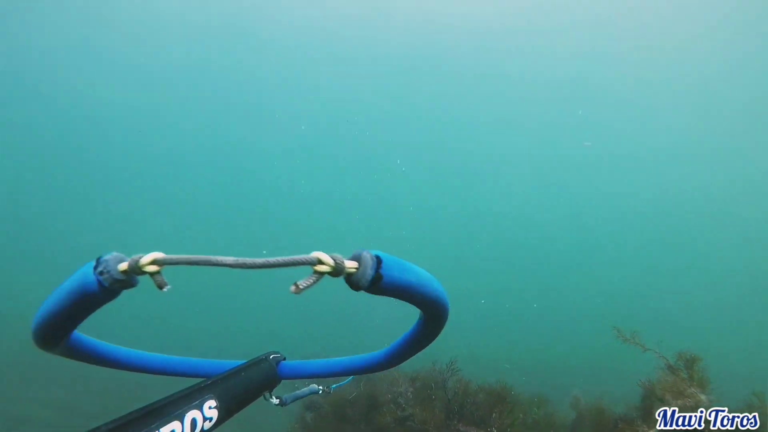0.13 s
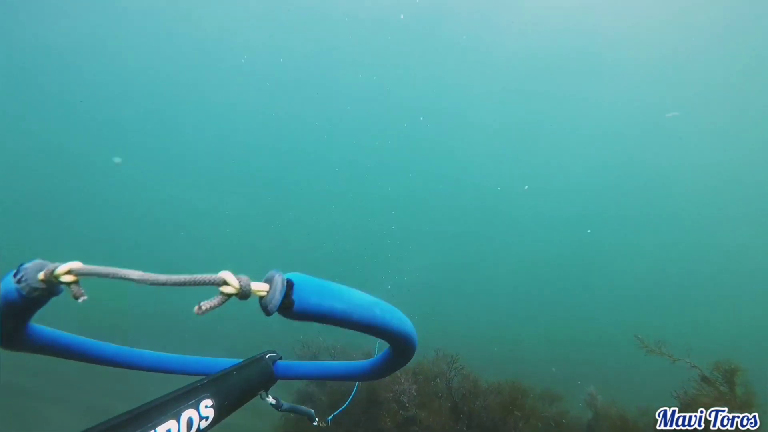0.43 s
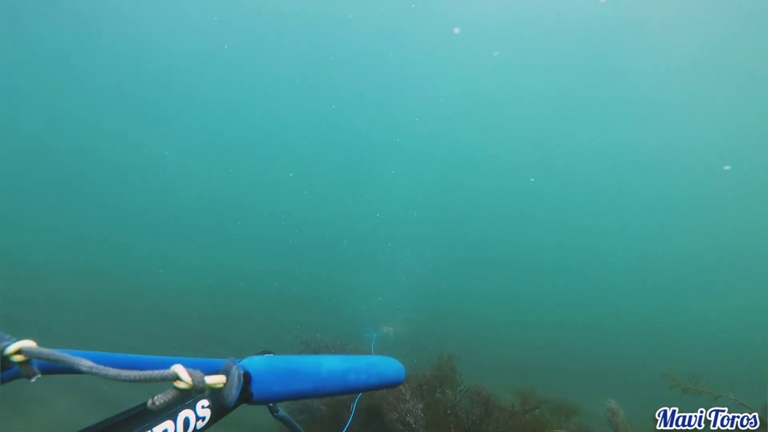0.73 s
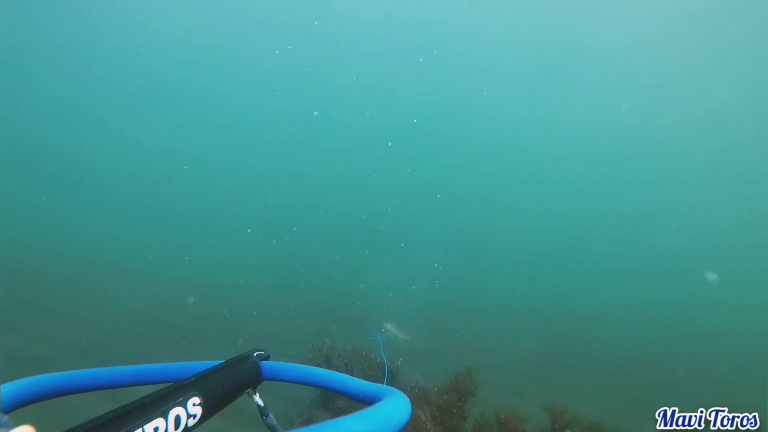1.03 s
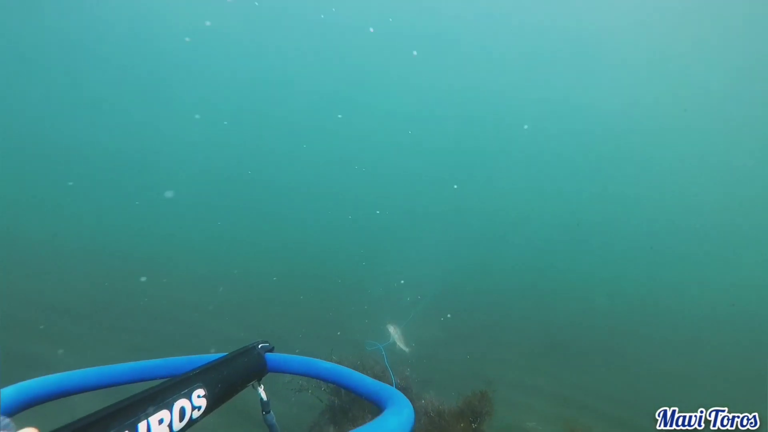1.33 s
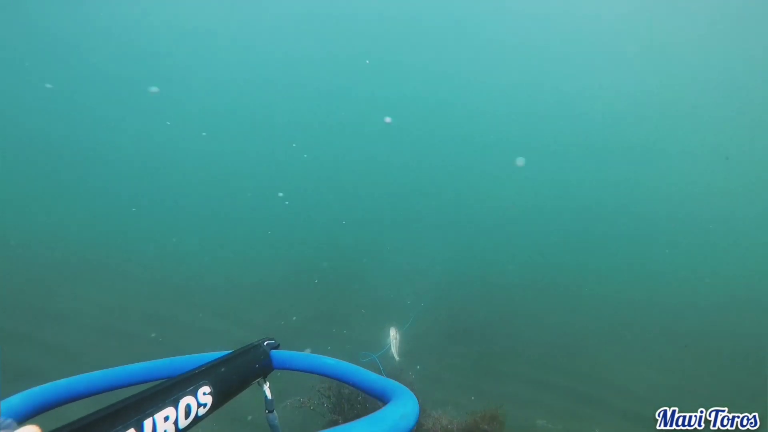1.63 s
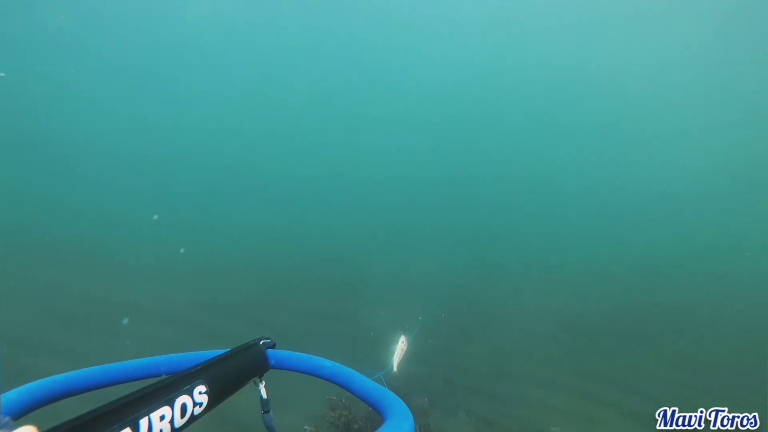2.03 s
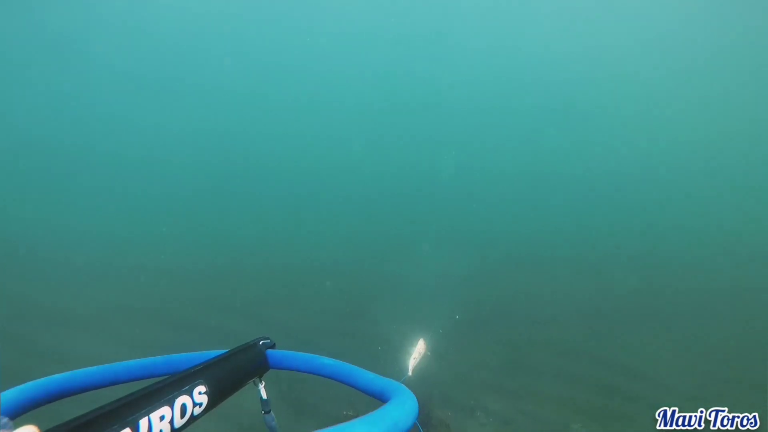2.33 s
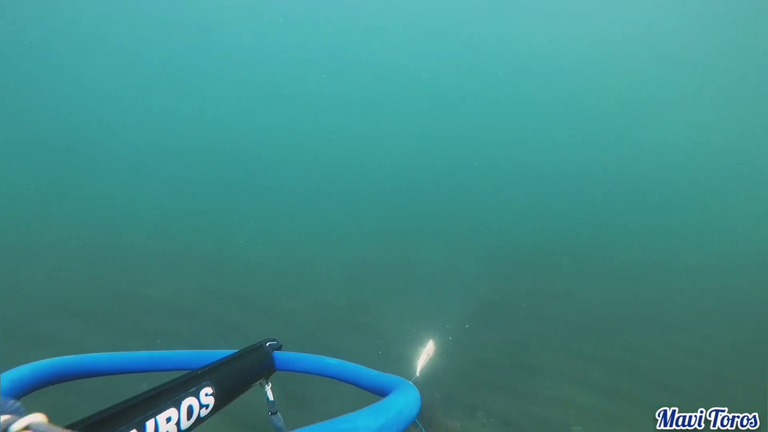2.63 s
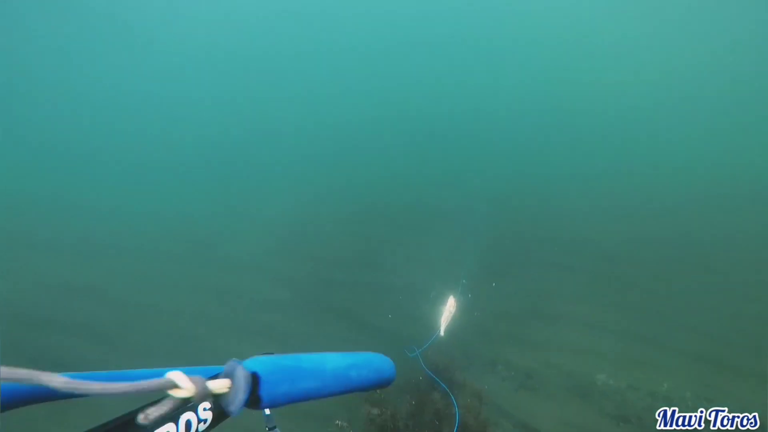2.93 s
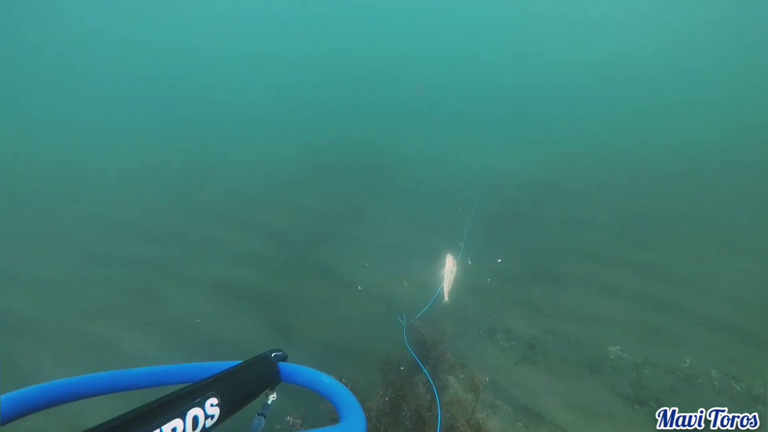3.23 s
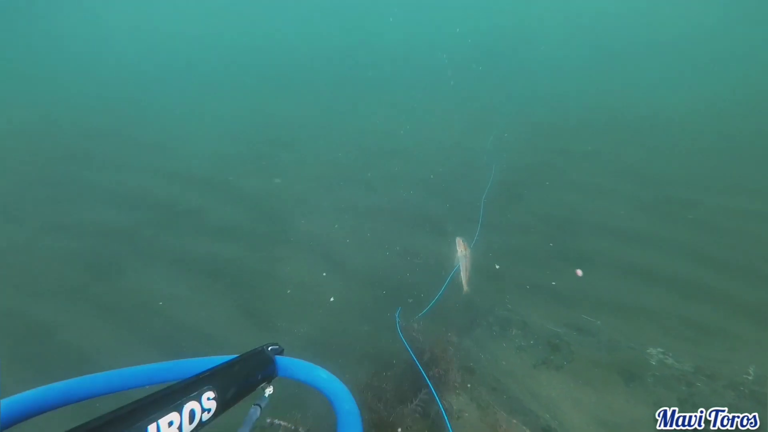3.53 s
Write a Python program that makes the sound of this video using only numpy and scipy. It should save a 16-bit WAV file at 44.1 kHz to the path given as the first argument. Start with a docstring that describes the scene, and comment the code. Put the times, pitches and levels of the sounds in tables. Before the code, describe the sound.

Water rumbles and sloshes against a sealed underwater camera housing, surging heavily near the end with one hollow knock

```python
"""Water rumbles, sloshes and rushes right against a sealed camera housing on a speargun, under water.
Faint rasps, scrapes, eddy thumps, bubbles and gear ticks sit on the case, close to its two microphone ports;
a hard kick near the end brings a surge and one hollow knock. Water is lumpy filtered noise, thumps and bubbles
are swelling cosines, scrapes are noise bursts, ticks are bursts through resonances, the knock is decaying sines.
The recorder starts in mono and opens to its two ports after two seconds."""
import sys
import numpy as np
from scipy import signal
from scipy.fft import rfft, irfft, next_fast_len
from scipy.io import wavfile
from scipy.ndimage import uniform_filter1d, minimum_filter1d

SR = 44100
rng = np.random.default_rng(int(sys.argv[2]) if len(sys.argv) > 2 else 0)


def unload_wav(signal):
    """Save mono or channel-first audio to the path in sys.argv[1] as 16-bit WAV at rate SR, clipped to [-1, 1]."""
    wavfile.write(
        sys.argv[1],
        SR,
        np.round(np.clip(np.atleast_2d(signal).T, -1, 1) * 32767).astype(np.int16),
    )


N = 163170
LONG = N + SR // 2  # samples, with half a second to spare for late tails


def gain_of(db):
    """Decibels to gain."""
    return 10 ** (np.asarray(db) / 20)


def evened(x):
    """Scales to rms 1."""
    return x / np.sqrt(np.mean(x ** 2) + 1e-20)


def peaked(x, db):
    """Scales to a peak level."""
    return gain_of(db) * x / np.abs(x).max()


def smoothed_twice(x, size):
    """Two moving averages in a row."""
    return uniform_filter1d(uniform_filter1d(x, size=size), size=size)


def read(points, hz):
    """Reads a spectrum table on a log frequency axis."""
    f, value = np.transpose(points)
    return np.interp(np.log(hz + 1), np.log(f + 1), value, left=value[0], right=value[-1])


def shut(points):
    """Closes a spectrum table steeply, an octave beyond both ends."""
    return [(points[0][0] / 2, -90)] + points + [(points[-1][0] * 2, -90)]


def coloured(x, gain):
    """Filters by a gain given as a function of frequency."""
    size = next_fast_len(x.shape[-1] + SR // 10)
    spectrum = rfft(x, size) * gain(np.fft.rfftfreq(size, 1 / SR))
    return irfft(spectrum, size)[..., :x.shape[-1]]


def add(mix, s, sound):
    """Mixes a sound in at time s."""
    part = mix[round(s * SR):][:len(sound)]
    part += sound[:len(part)]


# How the water swells and sinks around the case. Each row: time in seconds, then the levels
# of rumble, slosh, rush and hiss in dB.
WATER_LEVELS = [(0, -64, -63, -63, -81), (.3, -47, -49.5, -52.5, -78.5), (.55, -46.5, -45.5, -46, -72.5),
                (1.05, -41, -43.5, -48, -67.5), (1.098, -21, -30.5, -44.5, -68),
                (1.27, -35.5, -44.5, -46.5, -67), (1.68, -34.5, -36, -43, -62),
                (1.727, -35, -31, -36.5, -59.5), (2.2, -33.5, -41, -41.5, -58),
                (2.36, -33, -31.5, -46.5, -64.5), (2.763, -31.5, -43, -44.5, -61.5),
                (2.89, -16, -18, -35, -60.5), (3.161, -22.5, -12.5, -34.5, -66.5),
                (3.197, -20.5, -27, -53, -79.5), (3.328, -19.5, -22, -44, -70), (3.7, -18, -24, -44.5, -63)]


def water_level(column):
    """Gain of one water layer, sample by sample, in straight dB lines between the rows."""
    rows = np.array(WATER_LEVELS)
    return gain_of(np.interp(np.arange(LONG) / SR, rows[:, 0], rows[:, column]))


# Colour of each water layer at the case, deep to bright. Each row: frequency in Hz,
# relative density in dB per Hz.
RUMBLE_SPECTRUM = [(25, 2), (100, -1.5), (150, -11), (220, -51)]
SLOSH_SPECTRUM = [(60, -13), (130, -1.5), (262, -2), (400, -13), (700, -32), (2000, -50), (4000, -57)]
RUSH_SPECTRUM = [(480, 5), (640, -1), (1050, 0), (1200, -2), (1400, -15), (1900, -15.5), (2400, -16.5),
                 (2900, -21.5), (3500, -33)]
HISS_SPECTRUM = [(3500, 7.5), (7500, 5.5), (9600, 7.5), (13500, -7.5), (15200, -18.5)]
# Lumpiness of the water, one row each for rumble, slosh, rush and hiss. Each row: spread of the layer's
# own patches in dB, spread of the flicker shared by all layers in dB.
WATER_LUMPS = [(3, 2), (3, 1.5), (2.8, 1.8), (1, .8)]


def water():
    """Four layers of lumpy noise on their own levels; row 0 is shared by the ports, row 1 is not."""
    frames, bins = LONG // 128 + 9, 257
    flicker = evened(smoothed_twice(rng.standard_normal(frames), 9))
    out = np.zeros((2, LONG))
    for k, spectrum in enumerate([RUMBLE_SPECTRUM, SLOSH_SPECTRUM, RUSH_SPECTRUM, HISS_SPECTRUM]):
        patch_db, flicker_db = WATER_LUMPS[k]
        draw = rng.standard_normal((5, bins, frames))
        # patches span more bins in the brighter layers
        patches = uniform_filter1d(draw[4], size=3 + 2 * k, axis=0)
        patches = evened(uniform_filter1d(patches, size=8, axis=1))
        lumps = gain_of(patch_db * patches + flicker_db * flicker)
        cells = (draw[:2] + 1j * draw[2:4]) * lumps
        noise = signal.istft(cells, nperseg=512, noverlap=384)[1][:, :LONG]
        noise = coloured(noise, lambda f: gain_of(read(shut(spectrum), f)))
        out += water_level(k + 1) * evened(noise)
    return out


RISE_SHARE = .23  # rise time as a share of the decay time
RASP_Q = 1.57


def burst(decay_s):
    """A rattle of noise with a soft start and an exponential decay."""
    t = np.arange(SR // 10) / SR
    rise = np.minimum(t / (RISE_SHARE * decay_s), 1)
    return rng.standard_normal(len(t)) * rise * np.exp(-t / decay_s)


def rasp(decay_s, db, hz):
    """A short rasp of noise around a broad centre."""
    return peaked(coloured(burst(decay_s), lambda f: 1 / (1 + (RASP_Q * (f / hz - hz / (f + 1))) ** 2)), db)


TICK_DECAY_S = .003  # of the bursts in faint rasps, ticks and the knock's crack
FAINT_PER_S = 70  # mean rate
FAINT_DB, FAINT_SPREAD_DB = 13.5, 3  # base gain over the hiss level, scale of the random extra
FAINT_HZ = (1500, 5000)  # lowest and highest pitch
FAINT_STEP_DB = -1  # from each of the twelve pitches to the next


def faint_ticks():
    """Small chance rasps on the case, dull to bright, following the hiss level."""
    extra_db = FAINT_SPREAD_DB * np.minimum(rng.exponential(1, LONG), 3)
    hits = gain_of(extra_db) * (rng.random(LONG) < FAINT_PER_S / SR)
    pitches = np.geomspace(*FAINT_HZ, num=12)
    which = rng.integers(0, len(pitches), LONG)
    total = np.zeros(LONG)
    for k, hz in enumerate(pitches):
        sound = rasp(TICK_DECAY_S, FAINT_STEP_DB * k, hz)
        total += signal.oaconvolve(hits * (which == k), sound)[:LONG]
    return gain_of(FAINT_DB) * water_level(column=4) * total


SCRAPE_DECAY_S = .0092
# Bright scrapes and splashes close on the case. Each row: start in seconds, peak in dB, centre in Hz.
SCRAPE_EVENTS = [(0.11, -56.5, 4170), (0.742, -37, 3700), (1.13, -42, 8800), (1.277, -53, 4000),
                 (1.706, -41, 8000), (1.812, -33, 2870), (1.859, -23.5, 3540), (2.679, -46.5, 4130),
                 (2.9, -40, 3830), (2.972, -34.5, 2520), (3.623, -34.5, 2870)]


def scrapes(gear):
    """Adds the scrapes and splashes, each a burst of broadly centred noise."""
    for s, db, hz in SCRAPE_EVENTS:
        add(gear, s, rasp(SCRAPE_DECAY_S, db, hz))


def thump(centre, db, hz, cycles):
    """A cosine in a bell-shaped swell: a soft push of a cycle or two, or a bubble that rings for several."""
    t = np.arange(-2 * cycles / hz, 2 * cycles / hz, 1 / SR)
    swell = np.exp(-(2 * t * hz / cycles) ** 2)
    return centre + t[0], gain_of(db) * swell * np.cos(2 * np.pi * hz * t)


# Eddies that thump the case and trapped bubbles that blip. Each row: centre in seconds, peak in dB,
# pitch in Hz, length in cycles.
THUMP_EVENTS = [(.465, -38.5, 770, 25), (0.828, -32, 500, 7.1), (0.847, -21.5, 103, 1.6),
                (1.089, -25, 281, 5.7), (1.192, -20.5, 60, 0.77), (1.331, -19, 82, 0.98),
                (1.849, -24.5, 267, 7.4), (2.634, -15, 89, 1.25), (2.991, -14, 1800, 4.6),
                (3.418, -11, 86, 1.75)]


def thumps(gear):
    """Adds the eddy thumps and bubble blips."""
    for row in THUMP_EVENTS:
        add(gear, *thump(*row))


def resonate(x, hz, width):
    """A steep resonance: one pole pair, passed twice."""
    pole = np.exp((2j * hz - width) * np.pi / SR)
    return 2 * (1 - abs(pole)) ** 2 * signal.lfilter([1], np.poly([pole, pole]), x).real


# Resonances of the housing. Each row: frequency in Hz, width of one pole in Hz, relative gain in dB.
CASE_MODES = [(1018, 460, 17), (2170, 27, 8.5), (2400, 310, 5.5), (2810, 550, -1)]


def case(x):
    """The case rings briefly; neighbouring modes have opposite signs."""
    return sum((-1) ** k * gain_of(db) * resonate(x, hz, width)
               for k, (hz, width, db) in enumerate(CASE_MODES))


TICK_WIDTH_HZ = 160
CASE_DB = 1  # ringing of the case against the tick's own pitch
BOUNCE_S, BOUNCE_DB = .008, -5  # delay and gain of the second burst


def tick(s, db, hz):
    """A rattle and its bounce ring their own pitch and the case."""
    drive = burst(TICK_DECAY_S)
    add(drive, BOUNCE_S, gain_of(BOUNCE_DB) * burst(TICK_DECAY_S))
    own_pitch = evened(resonate(drive, hz, TICK_WIDTH_HZ))
    return s, peaked(own_pitch + gain_of(CASE_DB) * evened(case(drive)), db)


# Gear ticking on the case. Each row: start in seconds, peak in dB, pitch in Hz.
TICK_EVENTS = [(1, -29.5, 1164), (1.078, -35, 1700), (1.156, -29.5, 1360), (1.164, -32.5, 1750),
               (1.466, -28.5, 1750), (1.498, -33.5, 1780), (1.615, -25.5, 515), (1.703, -26, 2360),
               (1.813, -19.5, 1200), (1.924, -27.5, 850), (2.149, -29, 2400), (2.429, -28, 1770),
               (2.68, -26, 750), (2.733, -24, 1950), (2.892, -23, 1510), (3.285, -22.5, 1140),
               (3.493, -38.5, 2410), (3.601, -34.5, 2400), (3.534, -32.5, 2430), (3.627, -25, 966)]


def ticks(gear):
    """Adds the gear ticks."""
    for row in TICK_EVENTS:
        add(gear, *tick(*row))


KNOCK_S, KNOCK_RISE_S = 3.157, .003  # start and rise time
KNOCK_CRACK_DB, KNOCK_CRACK_HZ = -16, 1600
# Hollow ring of the knocked case. Each row: frequency in Hz, level before the rise in dB,
# time to fall 60 dB in seconds.
KNOCK_MODES = [(268.3, 3, 0.089), (2170, -29.5, 0.071)]


def knock():
    """A crack of noise on the hollow case's decaying sines."""
    t = np.arange(SR // 2) / SR
    ring = sum(gain_of(db - 60 * t / t60) * np.sin(2 * np.pi * hz * t) for hz, db, t60 in KNOCK_MODES)
    ring = ring * np.minimum(t / KNOCK_RISE_S, 1)
    add(ring, 0, rasp(TICK_DECAY_S, KNOCK_CRACK_DB, KNOCK_CRACK_HZ))
    return ring


# Difference between the two microphone ports. Each row: frequency in Hz, side minus mid in dB
# before the recorder sets the width.
PORT_SIDE = [(30, -13), (250, -1), (600, 8.5), (2400, 8), (3300, -10), (15000, 0.5)]
# How far the ports hear the same water. Each row: frequency in Hz, share of the side
# that is the mid turned in phase.
PORT_TIE = [(250, .3), (600, .8)]


def scene():
    """Mid and side at two ports of the case: gear's side is its mid turned a quarter cycle, water's partly."""
    gear = faint_ticks()
    scrapes(gear)
    thumps(gear)
    ticks(gear)
    add(gear, KNOCK_S, knock())
    flow, other = water()

    def side_gain(f):
        return gain_of(read(PORT_SIDE, f))

    def tied(f):
        return np.clip(read(PORT_TIE, f), 0, 1)

    side = coloured(gear, lambda f: 1j * side_gain(f))
    side = side + coloured(flow, lambda f: 1j * tied(f) * side_gain(f))
    side = side + coloured(other, lambda f: np.sqrt(1 - tied(f) ** 2) * side_gain(f))
    mid = gear + flow
    return np.array([mid + side, mid - side])[:, :N]


CEILING, LIMIT_S = .9, .012  # full scale is 1; smoothing time


def limited(pair):
    """A limiter turns both channels down smoothly around peaks over the ceiling."""
    size = round(LIMIT_S * SR)
    room = np.minimum(CEILING / (np.abs(pair).max(axis=0) + 1e-9), 1)
    return pair * smoothed_twice(minimum_filter1d(room, size=2 * size), size)


WIDTH_SPLIT_HZ, EDGE_HZ, FADE_S = 210, 15165, .008  # bass split, top of the band, fade-out
# Opening of the stereo width. Each row: time in seconds, gain of the side's bass in dB,
# gain of the rest of the side in dB.
STEREO_WIDTH = [(2.05, -72, -55), (2.09, -21, -19), (2.25, -29, -6.5), (3.051, 4.5, 1), (3.55, -1, -9),
                (3.7, -16, -16)]


def record(dry):
    """Mono at first, then the stereo width opens and narrows; limiter, a short fade-out, band limit."""
    mid, side = (dry[0] + dry[1]) / 2, (dry[0] - dry[1]) / 2
    low = coloured(side, lambda f: 1 / (1 + 1j * f / WIDTH_SPLIT_HZ) ** 2)
    s, low_db, rest_db = np.transpose(STEREO_WIDTH)
    t = np.arange(N) / SR
    low_gain = gain_of(np.interp(t, s, low_db))
    rest_gain = gain_of(np.interp(t, s, rest_db))
    side = low * low_gain + (side - low) * rest_gain
    fade = np.minimum((t[-1] - t) / FADE_S, 1)
    pair = limited(np.array([mid + side, mid - side])) * fade
    band = signal.firwin(511, EDGE_HZ, window=("kaiser", 9), fs=SR)
    return signal.oaconvolve(pair, band[None], "same", axes=1)


dry = scene()
out = record(dry)
unload_wav(out)
```